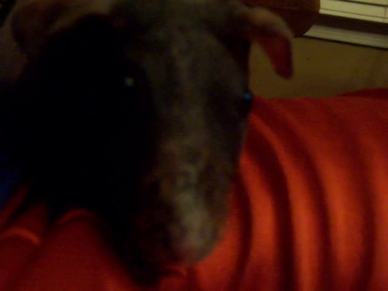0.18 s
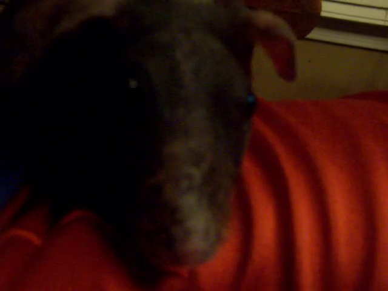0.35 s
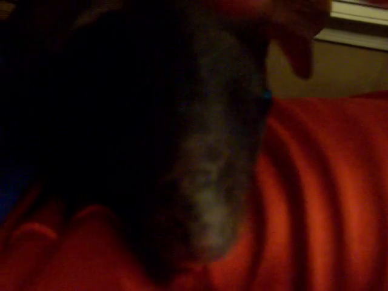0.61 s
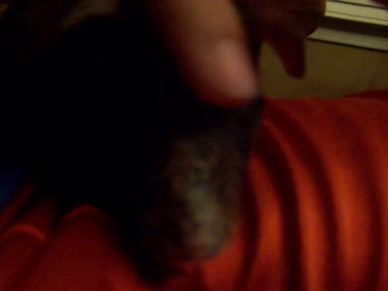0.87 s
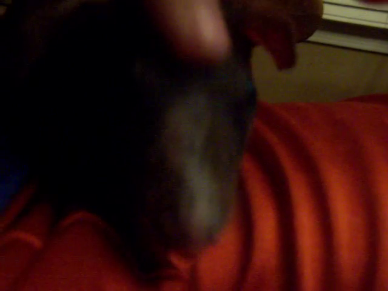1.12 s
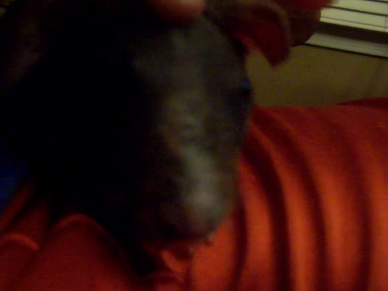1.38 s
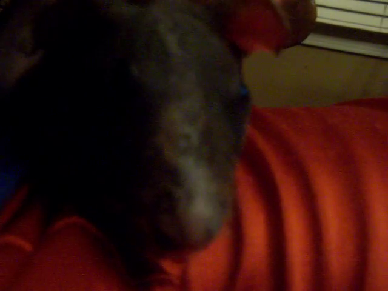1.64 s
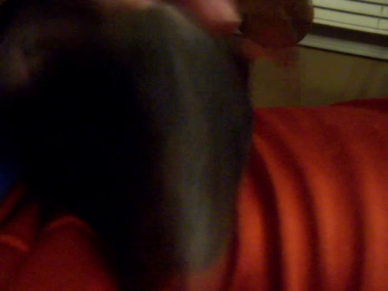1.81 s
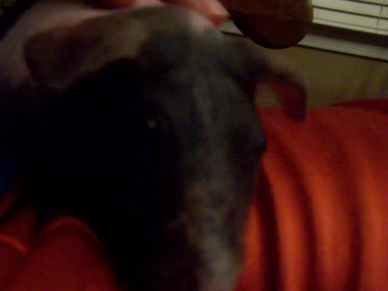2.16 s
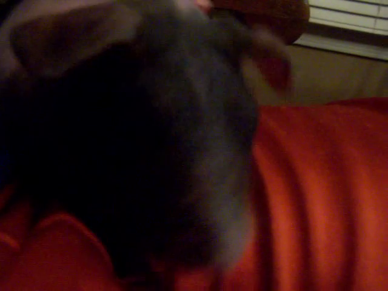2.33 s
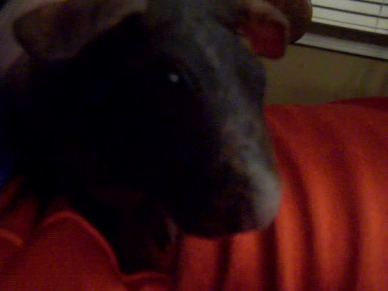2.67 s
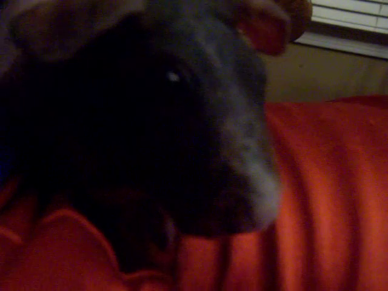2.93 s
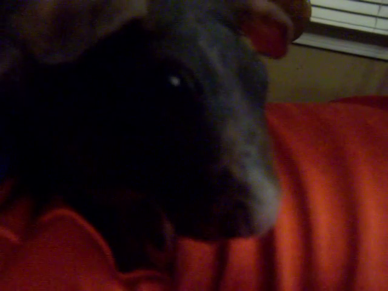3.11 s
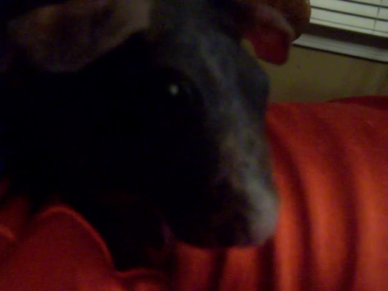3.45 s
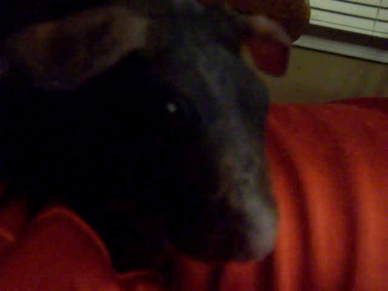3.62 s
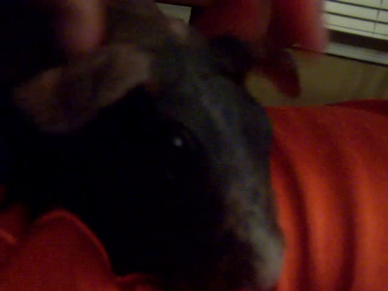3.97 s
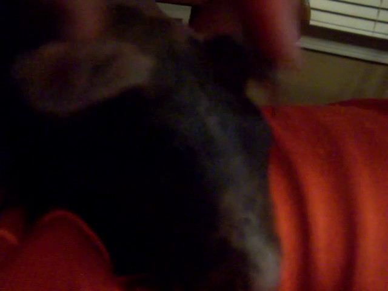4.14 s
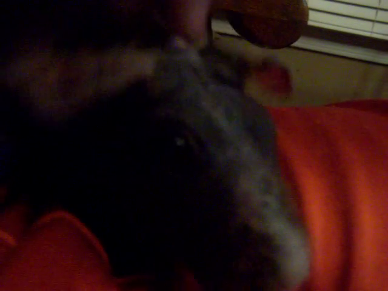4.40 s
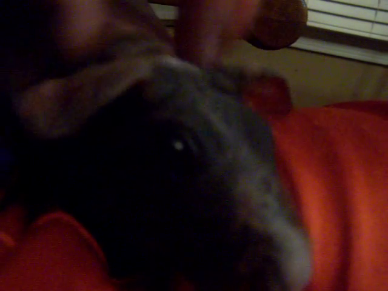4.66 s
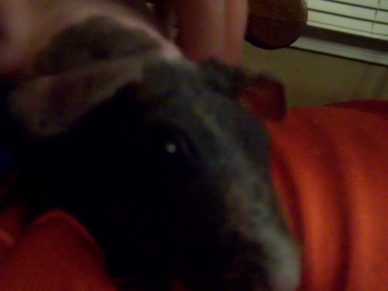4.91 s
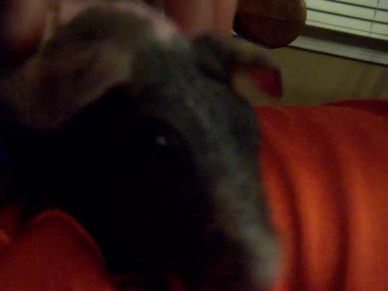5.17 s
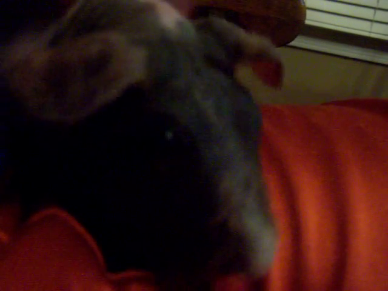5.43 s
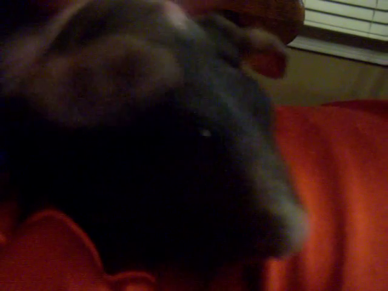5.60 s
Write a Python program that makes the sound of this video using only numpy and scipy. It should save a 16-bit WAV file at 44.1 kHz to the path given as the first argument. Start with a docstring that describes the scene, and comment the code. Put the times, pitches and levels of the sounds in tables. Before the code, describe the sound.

A guinea pig squeaks close to a small camera microphone in a quiet furnished room. It starts with sparse, soft, low chirps, then settles into groups of two to four short, nearly pure squeaks with upward flicks and brief gaps. Soft hand brushes swell and fade among them. Low hum, fan-like murmur, hiss and a thin steady whine stay underneath to the end.

```python
"""Guinea pig stroked on a lap

Short gliding squeaks come in runs: a nearly pure tone with a few overtones, and now and then a crack
or a soft flap of the vocal folds. A hand brushes over skin and blanket as swells of shaped noise.
The quiet room adds a faint mains hum and a low fan-like murmur, the camera its hiss and thin whine."""
import sys
import numpy as np
from scipy import signal
from scipy.fft import rfft, irfft, next_fast_len
from scipy.io import wavfile
from scipy.ndimage import map_coordinates

SR = 44100
rng = np.random.default_rng(int(sys.argv[2]) if len(sys.argv) > 2 else 0)


def bounce(signal):
    """Save signal as a 16-bit WAV file at the path given by the first command-line argument."""
    frames = np.transpose(np.atleast_2d(signal))
    limited = np.clip(frames, -1, 1)
    pcm = np.round(limited * 32767).astype(np.int16)
    wavfile.write(sys.argv[1], SR, pcm)


N = 254898
TIME = np.arange(N) / SR

# Squeaks, before waver, kick and catch: start_s, length_s, pitch_hz, glide_oct (over the squeak),
# arch_oct (opening), flick_oct (closing), level_db (at the start), fade_db (over the squeak)
SQUEAK_NOTES = [(0.022, 0.047, 1042, -0.07, 0.12, 0.14, -27, 3.0),
                (0.304, 0.07, 634, 0.7, 0.33, 0.23, -32.0, -3.5),
                (0.839, 0.018, 648, 0.64, 0.0, 0.075, -34.5, -1),
                (0.928, 0.028, 600, 0.66, 0.21, 0.0, -33.5, -3),
                (0.986, 0.014, 757, 0.59, 0.093, 0.18, -28, 2.5),
                (1.037, 0.019, 620, 0.51, 0.14, 0.0, -30.5, 0),
                (1.289, 0.069, 626, -0.55, 0.84, 1.62, -29.5, -5),
                (1.387, 0.066, 812, 0.29, 0.082, 0.57, -23.5, 4.5),
                (1.488, 0.056, 849, 0.22, 0.0, 0.58, -23.0, 3.5),
                (1.804, 0.075, 716, 0.087, 0.71, 1.23, -29.5, -7.5),
                (1.901, 0.069, 939, 0.06, 0.054, 0.73, -20.5, -0.5),
                (2.007, 0.042, 1184, 0.19, 0.0, 0.094, -20, 2.5),
                (2.238, 0.068, 690.0, -0.75, 0.94, 1.72, -23.5, -1),
                (2.341, 0.051, 905.0, -0.048, 0.17, 0.93, -22.5, 8),
                (2.436, 0.025, 1207, -0.16, 0.06, 0.096, -25, 3),
                (2.685, 0.055, 939, -1.11, 0.0, 1.71, -24, 1),
                (2.772, 0.067, 884, -0.36, 0.061, 1.27, -22.5, 5.0),
                (2.874, 0.055, 914, -0.16, 0.0087, 0.88, -24, 2),
                (2.982, 0.016, 895, -0.068, 0.0, 0.038, -27.5, 4),
                (3.179, 0.03, 640, 0.61, 0.015, 0.27, -29.5, 2.0),
                (3.223, 0.032, 688, -0.11, 0.0098, 0.95, -31.5, -3.5),
                (3.289, 0.07, 676, 0.49, 0.32, 0.49, -32.0, -2.5),
                (3.388, 0.03, 688, 0.39, 0.054, 0.033, -27.5, 1.5),
                (3.426, 0.016, 862, 0.37, 0.024, 0.096, -33.5, -2.5),
                (3.675, 0.068, 695, -0.5, 0.67, 1.35, -27.5, -2.5),
                (3.774, 0.064, 810, 0.2, 0.16, 0.73, -23, 5.5),
                (3.881, 0.058, 870, -0.11, 0.082, 0.55, -22, 4),
                (4.154, 0.073, 762, 0.1, 0.81, 1.06, -24.5, -1.0),
                (4.268, 0.06, 868, 0.29, 0.027, 0.19, -23, 15.5),
                (4.598, 0.035, 965.0, -0.23, 0.5, 0.0, -24.0, 9),
                (4.639, 0.032, 911, 0.14, 0.016, 0.84, -29, -3),
                (4.707, 0.061, 951, -0.084, 0.38, 0.64, -23.5, 4),
                (4.82, 0.019, 1057, 0.099, 0.0, 0.12, -29, 0),
                (5.052, 0.075, 815, -0.4, 0.51, 1.22, -25.5, -1.5),
                (5.161, 0.059, 878, -0.073, 0.12, 1, -22.0, 4.5),
                (5.258, 0.062, 974, 0.022, 0.1, 0.91, -21.5, 2),
                (5.489, 0.071, 783, 0.32, 0.54, 0.92, -25, -4.5),
                (5.617, 0.039, 970, 0.51, 0.22, 0.3, -22.5, 2.5)]
# Moments when the voice cracks to half its pitch: centre_s, half_length_s
VOICE_CRACKS = [(1.916, 0.01), (3.288, 0.0083), (4.267, 0.0068)]
# Single creaking flaps of the folds as some squeaks take hold: start_s, level_db (peak, before the trim)
FOLD_FLAPS = [(3.289, -21.5), (5.6027, -18), (5.6088, -14), (5.614, -22)]
# Overtones at the usual pitch, before brightness and wobble: harmonic_number, level_db
VOICE_OVERTONES = [(2, -10.5), (3, -19), (4, -27.5)]
# Brightness of the voice from run to run: time_s, overtones_db
VOICE_BRIGHTNESS = [(0, -6), (.4, -4), (1.4, -2), (2.0, 0.5), (2.8, 1), (3.3, -2.5), (3.9, -1), (4.25, 0),
                    (4.65, 4.5), (5.2, 3.5), (5.6, 1)]
# How the mouth radiates the voice: frequency_hz, gain_db
MOUTH_RADIATION = [(300, -1), (1000, 0.6), (3500, -0.5)]
# Strokes of the hand: start_s, swell_s, level_db (at the crest, before grain and echoes), top_band_db (relative)
HAND_STROKES = [(.478, 0.042, -37, 3), (.68, 0.087, -45.5, 3), (.84, .05, -38, -14),
                (1.05, 0.13, -41, -1.5), (1.419, 0.043, -43, -8.5), (1.914, .036, -25, -2.5),
                (2.298, 0.039, -31, -2.5), (3.27, 0.085, -34.5, -6.5), (3.54, 0.072, -29.5, -7.5),
                (3.86, 0.11, -42.5, 3), (4.05, 0.022, -47.5, 4), (4.20, .031, -44, 1), (4.34, .05, -38, -5),
                (4.62, 0.049, -44.5, -4.5), (4.81, 0.041, -40.5, 2), (5.02, .05, -41.5, -14.5),
                (5.171, .036, -35, -4.5), (5.538, 0.036, -31.5, -2)]
# Spectrum shape of the hand's friction: frequency_hz, density_db (per Hz, relative)
SKIN_FRICTION = [(700, -36), (1200, -16.5), (1750, -5.5), (2150, -6), (2900, -1.5), (3500, -3), (4500, -1),
                 (5500, 0.5), (6200, 1), (6800, -8.5), (7600, -11.5), (8900, -33)]
# Spectrum shape of room murmur and microphone hiss: frequency_hz, density_db (per Hz, relative)
ROOM_NOISE = [(20, -11), (45, -16.5), (80, -14.5), (105, -7.5), (155, -17.5), (190, -3), (260, -6),
              (310, -8.5), (400, -7.5), (600, -11), (850, -18.5), (1200, -21), (2000, -16), (5100, -17),
              (6900, -22), (8900, -52.5)]
# Mains hum and motor tones; the slower motor line beats against the mains: frequency_hz, level_db (rms)
HUM_LINES = [(58.7, -75), (59.9, -57.5), (104, -62.5), (119.8, -60), (226, -53.5), (256, -56), (273.5, -53),
             (362, -60)]
# The camera's whine: frequency_hz, level_db (rms)
WHINE_LINES = [(1001.3, -49.5), (2002.6, -59.5), (5006.5, -59.5)]
# Resonances of the camera's case around the microphone: centre_hz, width_hz, gain_db
CASE_RESONANCES = [(1890, 97, -3.5), (2904, 40, 7), (5020, 930, 3)]
# Decay of the room's reverberation: frequency_hz, t60_s
WALL_DECAY = [(200, 0.35), (1500, 0.32), (8000, 0.097)]

# Opening arch: extra tension that relaxes, with the pitch scooping up from below to meet it
ARCH_AT_S, ARCH_WIDTH_S = .0046, .0289
SCOOP_SHARE, SCOOP_S = 1.45, .0107
# The voice catches on the way down from the arch (dB per octave of arch)
CATCH_AT_S, CATCH_WIDTH_S, CATCH_DB_PER_OCT = .0276, 0.0055, 8
FLICK_S = .0081  # the folds tighten as they close, and the pitch flicks up
ATTACK_S, RELEASE_S, KICK_DB, KICK_S = .0017, 0.0046, 3, .0053  # an abrupt start with a brief kick
# Tighter folds give a purer tone; the throat passes little above its band
USUAL_HZ, PURER_DB_PER_OCT, THROAT_HZ = 886, 8.5, 2850
WANDER_OCT, WANDER_PER_S = .022, 80
CRACK_DROP_OCT = 0.269  # the pitch sags while the voice is cracked
# Some squeaks are followed by one soft flap (level before the trim)
CLOSE_SHARE, CLOSE_AFTER_S, CLOSE_SCATTER_S, CLOSE_DB = .4, .011, .004, -28
STROKE_T60_S = 0.76  # every stroke dies away alike
TOP_HZ = 9200  # the camera's band limit


def squeaks(jitter=.009, flutter_db=0.8, overtone_db=3.0, rasp_db=1.0, crack_db=-7):
    """The folds start abruptly, sing a nearly pure gliding tone and tighten upward as they close."""
    out = np.zeros(N)
    bends = 2 ** (WANDER_OCT * wobble(WANDER_PER_S))
    tremor = 1 + jitter * wobble(300)
    waver = bends * tremor
    flutter = amp(flutter_db * wobble(170))
    # firmer closing of the folds gives stronger overtones
    closure_db = np.interp(TIME, *np.transpose(VOICE_BRIGHTNESS)) + overtone_db * wobble(90)
    strengths = [(k, amp(db + closure_db + rasp_db * wobble(250))) for k, db in VOICE_OVERTONES]
    for start, length, hz, glide, arch, flick, db, fade_db in SQUEAK_NOTES:
        t = np.arange(int(length * SR)) / SR
        first = round(start * SR)
        span = slice(first, first + len(t))
        cracked = cracking(start + t)

        opening = bump(t, ARCH_AT_S, ARCH_WIDTH_S) - SCOOP_SHARE * np.exp(-t / SCOOP_S)
        closing = np.exp((t - length) / FLICK_S)
        octaves = glide * (t / length - .5) + arch * opening + flick * closing
        pitch = hz * 2 ** (octaves - CRACK_DROP_OCT * cracked) * waver[span]
        phase = 2 * np.pi * np.cumsum(pitch) / SR

        catch_db = CATCH_DB_PER_OCT * arch * bump(t, CATCH_AT_S, CATCH_WIDTH_S)
        level_db = db - fade_db * t / length + KICK_DB * np.exp(-t / KICK_S) - catch_db
        gate = np.clip(t / ATTACK_S, 0, 1) * np.clip((length - t) / RELEASE_S, 0, 1)

        def partial(k):
            """A sine at k times the pitch, as the throat passes it."""
            return np.sin(k * phase) / np.sqrt(1 + (k * pitch / THROAT_HZ) ** 10)

        richness = amp(-PURER_DB_PER_OCT * np.log2(pitch / USUAL_HZ))
        overtones = richness * sum(strength[span] * partial(k) for k, strength in strengths)
        # in a crack, strong and weak cycles alternate: lines appear halfway between the harmonics
        halves = partial(1 / 2) / 2 + partial(1 + 1 / 2) + partial(2 + 1 / 2) / 2
        # the main tone sits a hair below the pitch its overtones follow
        tone = partial(0.99) + overtones + amp(crack_db) * cracked * halves
        out[span] += amp(level_db) * gate * flutter[span] * tone
    return filtered(out, lambda hz: amp(along(MOUTH_RADIATION, hz)))


def cracking(t):
    """How far the voice has cracked at times t, 0-1."""
    return sum(np.clip(2 * (1 - np.abs(t - centre) / reach), 0, 1) for centre, reach in VOICE_CRACKS)


def bump(t, centre, width):
    """A smooth bump of height 1."""
    return np.exp(-((t - centre) / width) ** 2)


def flaps(trim_db=-3):
    """One flap of the folds rings the throat for a few milliseconds."""
    out, t = np.zeros(N), np.arange(SR // 40) / SR
    throat = [(820, 10.0, 0.0074), (1390, -6, 0.011), (2500, -25, .005)]  # frequency_hz, level_db, t60_s
    ring = sum(amp(db - 60 * t / t60) * np.cos(2 * np.pi * hz * t) for hz, db, t60 in throat)
    ring = signal.lfilter(*signal.butter(2, [400, 3000], "bandpass", fs=SR), ring)
    ring = ring / np.abs(ring).max()

    events = list(FOLD_FLAPS)
    chance = rng.random((len(SQUEAK_NOTES), 2))
    for (start, length, *_), (draw, late) in zip(SQUEAK_NOTES, chance):
        if draw < CLOSE_SHARE:
            scatter = CLOSE_SCATTER_S * (2 * late - 1)
            events.append((start + length + CLOSE_AFTER_S + scatter, CLOSE_DB))
    for start, db in events:
        out[round(start * SR):][:len(t)] += amp(db + trim_db) * ring
    return out


def stroking(grain_db=-1.0, split_hz=5200, echo_db=-7, echo_life_s=0.0075):
    """Skin sliding on skin and cloth: countless tiny slips merge into a hiss that swells and dies away."""
    slips = coloured(rng.standard_normal(N) * amp(grain_db * wobble(900)), SKIN_FRICTION)
    body = filtered(slips, lambda hz: 1 / (1 + (hz / split_hz) ** 6))
    top = slips - body
    out, t = np.zeros(N + SR), np.arange(SR) / SR
    for start, swell, db, top_db in HAND_STROKES:
        part = rng.integers(N - SR) + np.arange(SR)
        hiss = body[part] + amp(top_db) * top[part]  # lighter contact sounds brighter
        fall_db = 60 * np.maximum(t - swell, 0) / STROKE_T60_S
        level = np.clip(t / swell, 0, 1) * amp(db - fall_db)
        # the hand has moved, so every stroke meets other echoes
        out[round(start * SR):][:SR] += level * nearby(hiss, echo_db, echo_life_s)
    return out[:N]


def nearby(x, echo_db, life_s):
    """Adds the dense early echoes of close surfaces, which ripple the spectrum."""
    t = np.arange(SR // 20) / SR
    echoes = rng.standard_normal(len(t)) * np.exp(-t / life_s)
    echoes = echoes / np.linalg.norm(echoes)
    return x + amp(echo_db) * signal.fftconvolve(x, echoes)[:len(x)]


def walls(x):
    """The short, soft answer of a furnished room: noise that decays at its own rate in each band."""
    hz, t, z = signal.stft(rng.standard_normal(SR // 2), SR, nperseg=256)
    decay = amp(-60 * t / along(WALL_DECAY, hz)[:, None])
    tail = signal.istft(z * decay, SR, nperseg=256)[1]
    delayed = np.pad(x, (SR // 200, 0))  # 5 ms before the first reflection
    return signal.fftconvolve(delayed, tail / np.linalg.norm(tail))[:N]


def background(room_db=-41.0, hum_drift_rad=.4, whine_drift_rad=0.13):
    """Room murmur and microphone hiss as shaped noise, with a slightly unsteady hum and whine."""
    noise = amp(room_db) * coloured(rng.standard_normal(N), ROOM_NOISE)
    return noise + steady_tones(HUM_LINES, hum_drift_rad) + steady_tones(WHINE_LINES, whine_drift_rad)


def steady_tones(lines, drift_rad):
    """Sines at their rms levels, each with a slowly drifting phase."""
    out = np.zeros(N)
    for hz, db in lines:
        phase = 2 * np.pi * hz * TIME + drift_rad * wobble(6)
        out += np.sqrt(2) * amp(db) * np.sin(phase)
    return out


def coloured(x, spectrum):
    """x shaped by a spectrum and by the resonances of the camera's case, rms 1."""
    def response(hz):
        """Gain of the spectrum and the case together."""
        case_db = sum(db / (1 + (2 * (hz - centre) / width) ** 2) for centre, width, db in CASE_RESONANCES)
        return amp(along(spectrum, hz) + case_db)
    return unit(filtered(x, response))


def filtered(x, response):
    """x times a response of frequency."""
    m = next_fast_len(N + SR // 2)
    return irfft(rfft(x, m) * response(np.fft.rfftfreq(m, 1 / SR)), m)[:N]


def wobble(rate):
    """A smooth random curve, rate knots a second."""
    return map_coordinates(rng.standard_normal(int(N * rate / SR) + 4), [TIME * rate])


def along(points, hz):
    """Reads a curve of (frequency_hz, value) points on a log frequency axis."""
    f, v = np.transpose(points)
    return np.interp(np.log(hz + 1), np.log(f + 1), v)


def unit(x):
    """Scale to rms 1."""
    return x / np.sqrt(np.mean(x ** 2) + 1e-20)


def amp(db):
    """Decibels to gain."""
    return 10 ** (np.asarray(db) / 20)


def scene(wet_db=-21):
    """The voice with a little of the room's answer, the stroking hand and the background."""
    voice = squeaks() + flaps()
    return (voice + amp(wet_db) * walls(voice) + stroking() + background())[None]


def record(dry):
    """The camera keeps nothing above its band limit; the gain falls over the last 500 Hz below it."""
    return filtered(dry[0], lambda hz: np.clip((TOP_HZ - hz) / 500, 0, 1) ** 2)[None]


dry = scene()
out = record(dry)
bounce(out)
```